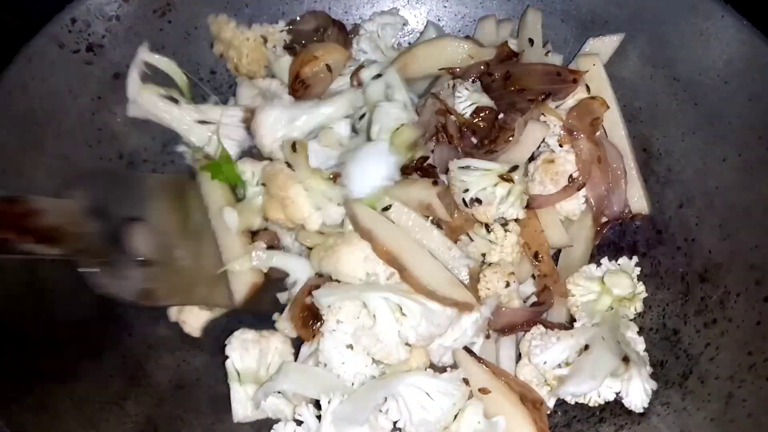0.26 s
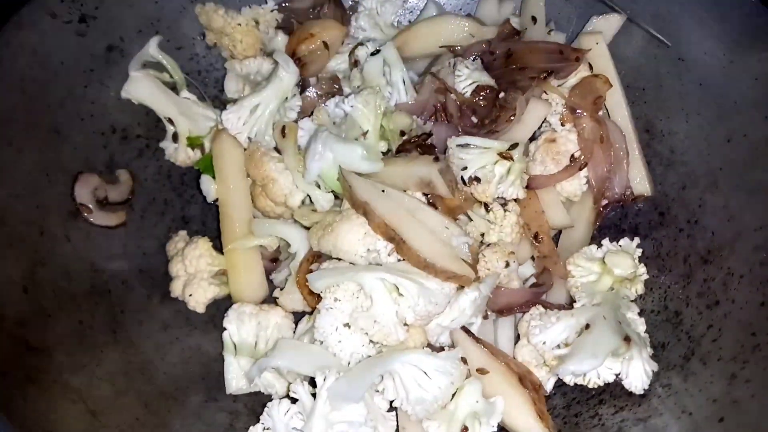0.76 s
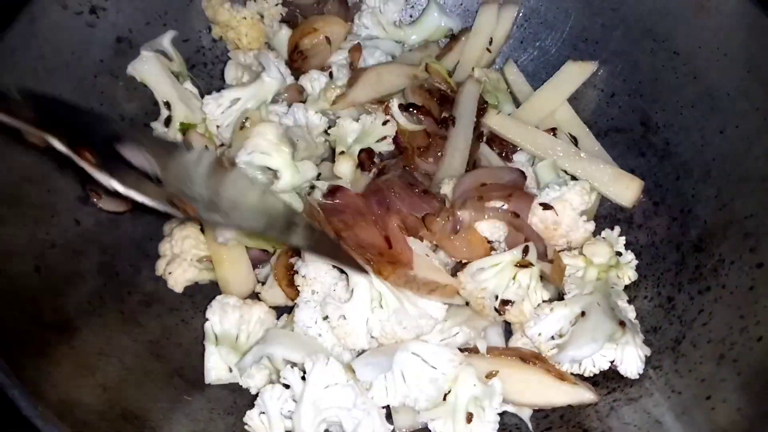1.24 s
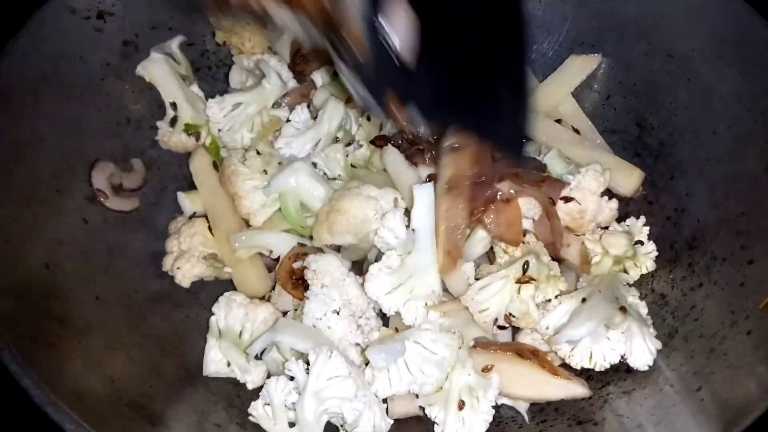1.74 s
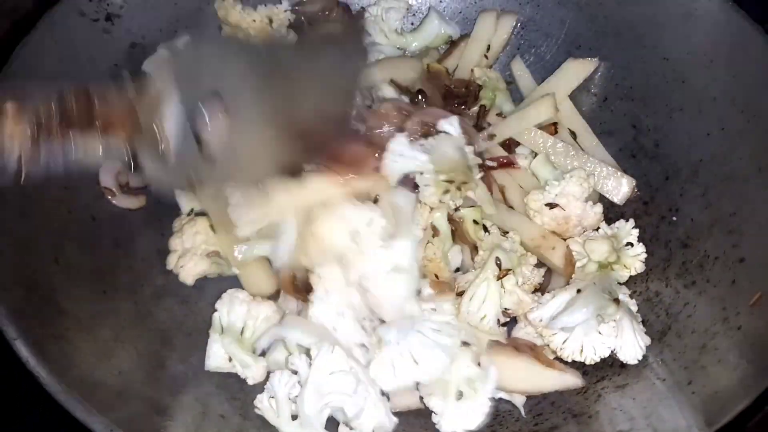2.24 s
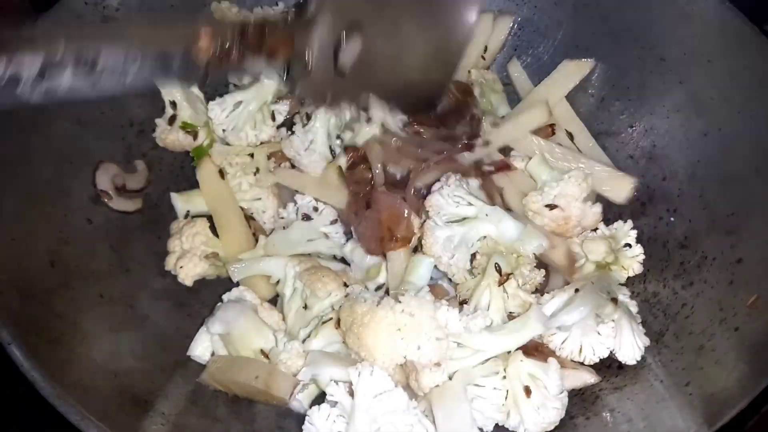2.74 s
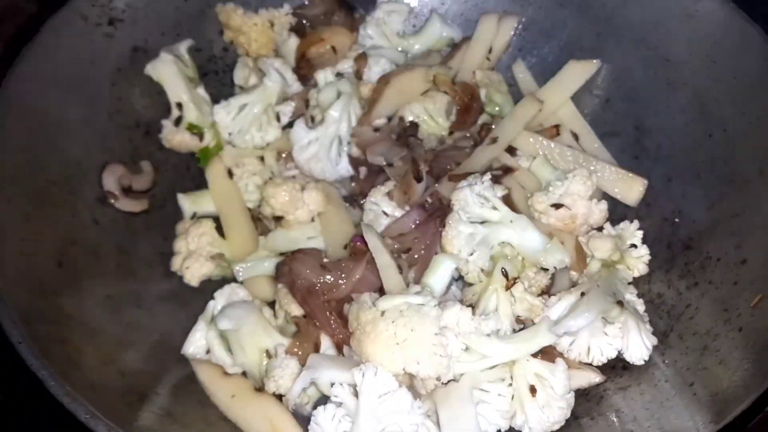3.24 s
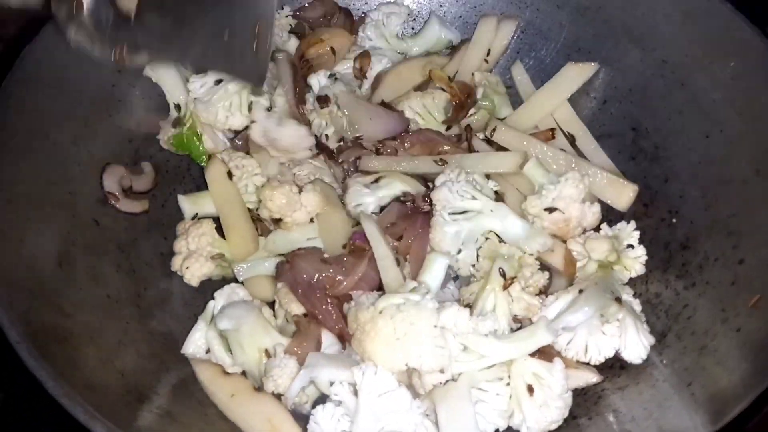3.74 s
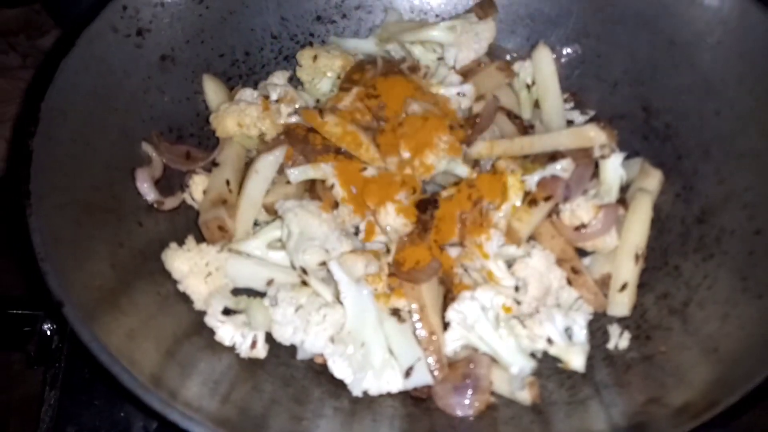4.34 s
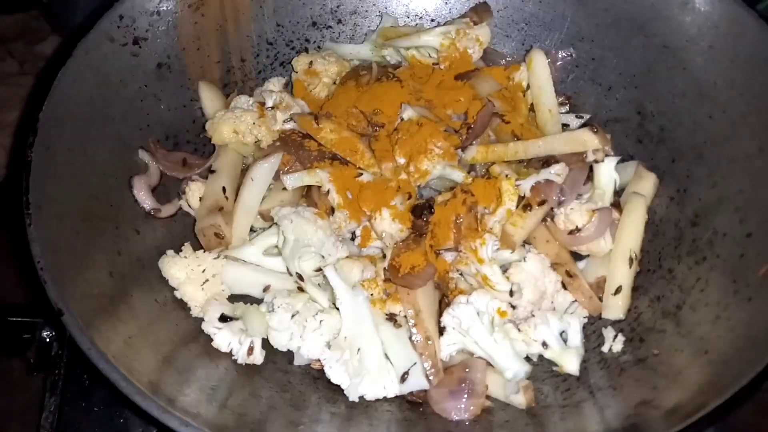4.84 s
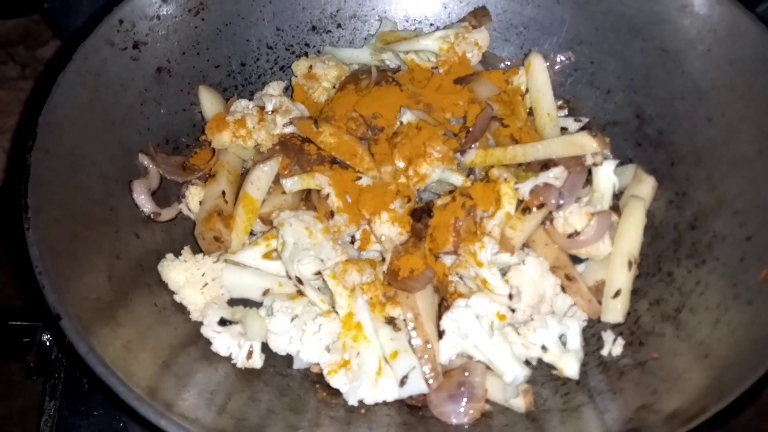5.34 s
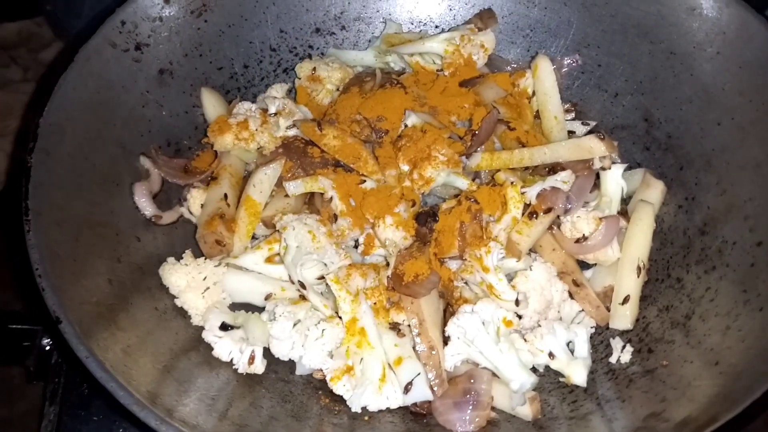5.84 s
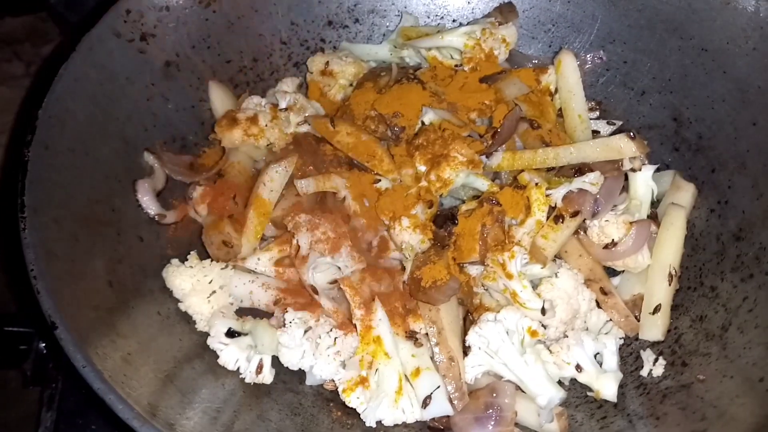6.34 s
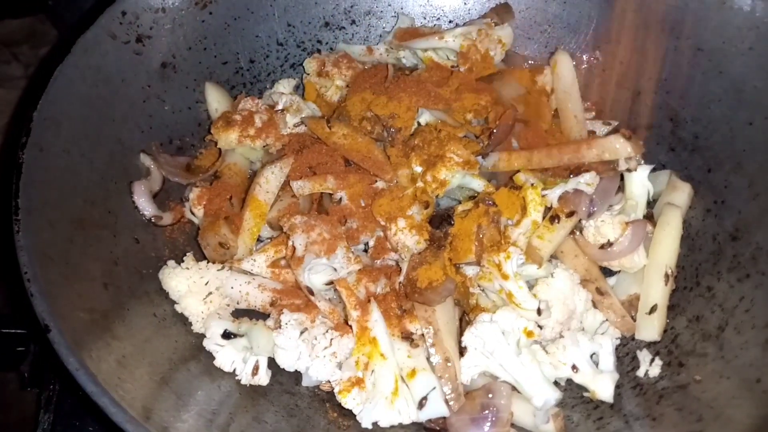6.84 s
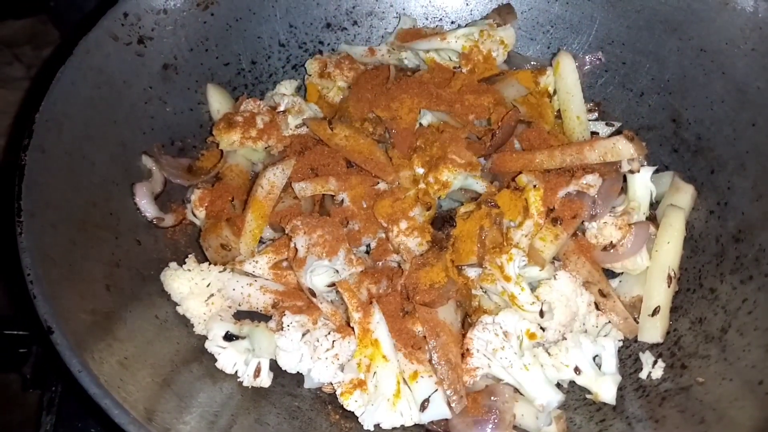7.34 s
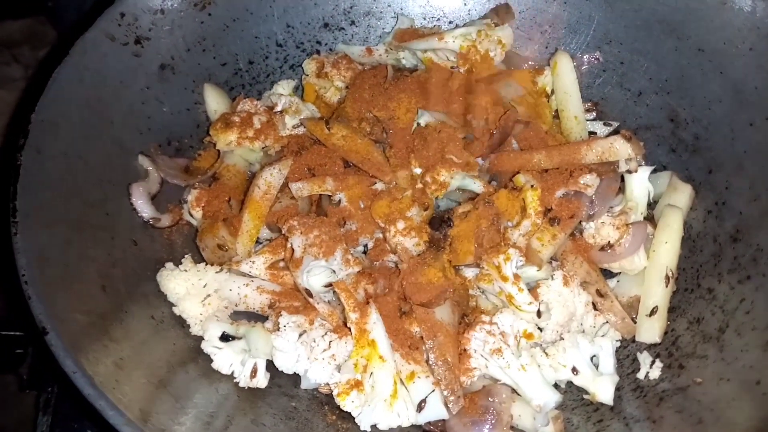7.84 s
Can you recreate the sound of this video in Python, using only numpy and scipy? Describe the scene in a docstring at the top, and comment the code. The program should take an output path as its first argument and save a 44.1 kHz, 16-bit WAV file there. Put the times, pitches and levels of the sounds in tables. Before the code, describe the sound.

A close, bright hiss of vegetables frying in a wok, dotted with crackles and pops of spitting oil.

```python
"""Vegetables fry in hot oil in a wok, close to a mono microphone. From the start, countless tiny steam
bubbles burst as a sizzle, in spurts, over the faint rush of the stove. Larger drops spit, and a limiter
ducks the sizzle around the loudest. At first the food is stirred, rubbing on the steel and knocking dully.
Near 3.8 s comes a short silent break. Then the food lies still: the sizzle is finer and a little weaker,
and for two seconds the oil spits more freely. Towards the end the sizzle thickens again."""
import sys
import numpy as np
from scipy import signal
from scipy.fft import rfft, irfft, next_fast_len
from scipy.io import wavfile
from scipy.ndimage import uniform_filter1d, minimum_filter1d, map_coordinates

SR = 44100
rng = np.random.default_rng(int(sys.argv[2]) if len(sys.argv) > 2 else 0)


def inscribe(sig):
    """Save sig as 16-bit PCM at rate SR to the path in sys.argv[1].

    A 1-D sig is mono; a 2-D sig holds one channel per row.
    Samples are clipped to [-1, 1] before scaling.
    """
    pcm = np.round(np.clip(np.atleast_2d(sig).T, -1, 1) * 32767)
    wavfile.write(sys.argv[1], SR, pcm.astype(np.int16))


N = 356769

# Reverberation time of the kitchen: frequency_hz, t60_s
ROOM_DECAY = [(200, 0.3), (2000, 0.1), (12000, 0.2)]
# Spectrum of the stove's rush: frequency_hz, relative_density_db
STOVE_SPECTRUM = [(20, -13), (60, -14), (95, 14), (140, 5), (250, -5), (600, -41), (2000, -86)]
# Response of the wok to rubbing: frequency_hz, relative_density_db
RUB_SPECTRUM = [(30, -31), (130, -16), (172, 1), (205, -10.5), (248, 6), (285, -8), (700, -0.5),
                (2000, -28), (6000, -70)]
# Shoves of the spatula: start_s, level_db
SPATULA_STROKES = [(.1, -71), (.95, -60), (1.85, -66), (2.42, -66), (3.15, -66)]
# Dull contacts of food and wok: start_s, level_db, pitch_hz
FOOD_KNOCKS = [(1.385, -57, 110), (1.948, -48, 170), (2.351, -41, 100), (2.765, -54, 190),
               (3.982, -44, 115), (5.02, -53, 220), (5.342, -46, 150)]
# The biggest slow bubbles bursting under the food: start_s, level_db
BIG_PLOPS = [(3.215, -20), (4.031, -23), (4.291, -23), (4.804, -24), (5.69, -22), (7.077, -24),
             (7.754, -23)]
# Resonances of the wok's bowl: frequency_hz, width_hz, boost_db
BOWL_MODES = [(242, 14, 13), (355, 42, 3.5), (540, 47, 4), (661, 40, 5), (726, 11, 6), (894, 31, 4.5),
              (1030, 170, 3), (1288, 62, 4), (1767, 270, 5), (2120, 230, 1), (2406, 250, 4.5),
              (3000, 84, 4), (4510, 450, 1.5), (6560, 230, 2)]
# Spectrum of one bursting bubble: frequency_hz, relative_density_db
BURST_SPECTRUM = [(100, -45), (220, -45.5), (340, -24.5), (850, -21), (1300, -15), (2150, -20.5),
                  (3100, -11.0), (4400, -5), (5300, -3.5), (6550, -1), (9200, -8.0), (12000, -18.5),
                  (13900, -23), (14650, -11)]
# How freely the oil spits: time_s, drops_per_s, typical_peak_db
SPIT_ACTIVITY = [(0, 35, -20.5), (3.8, 35, -20), (4.1, 65, -17.5), (5.8, 100, -16.5), (6.15, 35, -20),
                 (8.09, 30, -20.5)]
# The loudest spits, ahead of the limiter: start_s, peak_db
LOUD_SPITS = [(.5168, -4.5), (1.1463, -5.5), (1.2309, -6), (1.5971, -4.5), (2.2445, -2.5), (2.4746, -6.5),
              (2.7646, -4), (3.0482, -6.5), (3.8887, -6.5), (3.9248, -11), (3.9564, 2), (4.3029, -3),
              (4.4168, -1.5), (4.6229, -3.5), (4.6569, -6.5), (4.857, -3), (4.9612, -3), (5.2305, -5),
              (5.3416, -2), (5.4498, -2.5), (5.5462, -5.5), (5.6513, -1.5), (5.9207, -7), (5.958, -9),
              (7.5569, -4.5)]
# How hard the oil boils: time_s, relative_level_db
BOIL_LEVEL = [(0, -26.5), (1.0, -25), (1.8, -25.5), (2.1, -25), (3.0, -26), (3.8, -26), (4.0, -27.5),
              (4.3, -26.5), (5.0, -27.5), (5.7, -28), (6.2, -26.5), (7.0, -26), (8.09, -27)]
# Brief dips in the level of the sizzle: time_s, depth_db
SIZZLE_DIPS = [(.925, 3), (1.11, 3), (1.53, 6), (1.785, 5), (1.96, 2), (2.19, 4), (2.357, 7), (2.49, 3),
               (2.755, 2.5), (7.175, 3.5)]

BREAK_START_S, BREAK_END_S = 3.8095, 3.8858
TOP_HZ = 15750  # band limit
TIME_S = np.arange(N) / SR


def amp(db):
    """Amplitude ratio of a level in decibels."""
    return 10 ** (np.asarray(db) / 20)


def unit(x):
    """Normalisation to an rms of 1."""
    return x / np.sqrt(np.mean(x ** 2) + 1e-20)


def along(points, hz):
    """Interpolation of (frequency_hz, value) points on a logarithmic frequency axis."""
    knots_hz, values = np.transpose(points)
    return np.interp(np.log(hz + 1), np.log(knots_hz + 1), values)


def curves(rows):
    """Linear interpolation, at every sample, of each column after the time."""
    knots_s, *columns = np.transpose(rows)
    return [np.interp(TIME_S, knots_s, column) for column in columns]


def wobble(per_s):
    """Slow random modulation: a spline through Gaussian knots."""
    return map_coordinates(rng.standard_normal(int(N * per_s / SR) + 4), [TIME_S * per_s])


def filtered(x, response):
    """Linear filtering: the spectrum of x times a frequency response."""
    size = next_fast_len(N + SR // 2)
    return irfft(rfft(x, size) * response(np.fft.rfftfreq(size, 1 / SR)), size)[:N]


def shaped_noise(spectrum):
    """Spectral shaping of white noise, at an rms of 1."""
    return unit(filtered(rng.standard_normal(N), lambda hz: amp(along(spectrum, hz))))


def poisson(per_s):
    """A Poisson process: unit impulses at independent random moments."""
    return 1. * (rng.random(N) < per_s / SR)


def add(track, start_s, x):
    """Superposition of x on the track from start_s."""
    part = track[max(round(start_s * SR), 0):][:len(x)]
    part += x[:len(part)]


def kitchen(x, block=8192, delay_s=.005):
    """Short, smooth reverberation of a small hard kitchen, with a fresh random tail for each block."""
    track = np.zeros(N)
    for start in range(0, N, block):
        hz, t, noise = signal.stft(rng.standard_normal(SR // 3), SR, nperseg=256)
        decay = amp(-60 * t / along(ROOM_DECAY, hz)[:, None])
        tail = signal.istft(noise * decay, SR, nperseg=256)[1]
        echoes = signal.fftconvolve(x[start:start + block], tail / np.linalg.norm(tail))
        add(track, start / SR + delay_s, echoes)
    return track


def stove(level_db=-90, flutter_db=2.5):
    """Amplitude-modulated noise: a faint, restless low rush under the wok."""
    return amp(level_db + flutter_db * wobble(per_s=14)) * shaped_noise(STOVE_SPECTRUM)


def stirring(rise_s=0.066, fade_db_per_s=14):
    """Sliding friction of vegetables on steel: each shove builds quickly and fades as the food settles."""
    shoves = np.zeros(N)
    for start_s, level_db in SPATULA_STROKES:
        age_s = TIME_S - start_s
        fade_db = fade_db_per_s * np.maximum(age_s - rise_s, 0)
        shoves += np.clip(age_s / rise_s, 0, 1) * amp(level_db - fade_db)
    rub = shaped_noise(RUB_SPECTRUM)
    unevenness = amp(1.5 * wobble(per_s=11))
    return shoves * (TIME_S < BREAK_START_S) * unevenness * rub


def knocks(attack_s=0.00097, thud_t60_s=0.028, bowl_t60_s=0.037):
    """Impact excitation: a soft heavy contact gives a low thud and rings the bowl's two lowest modes."""
    track, t = np.zeros(N), np.arange(SR // 5) / SR
    modes = sum(np.sin(2 * np.pi * hz * t) for hz, _, _ in BOWL_MODES[:2])
    bowl = amp(-2 - 60 * t / bowl_t60_s) * modes
    thud_envelope = amp(-60 * t / thud_t60_s) * (1 - np.exp(-t / attack_s))
    for start_s, level_db, pitch_hz in FOOD_KNOCKS:
        thud = thud_envelope * np.sin(2 * np.pi * pitch_hz * t)
        add(track, start_s, amp(level_db) * (thud + bowl))
    return track


def plops(typical_hz=1320, t60_s=0.0051, small_db=-27):
    """Cavity resonance: an opening bubble gives a short rising note, with no bass below it."""
    track, t = np.zeros(N), np.arange(SR // 50) / SR
    small = [(at / SR, small_db) for at in np.flatnonzero(poisson(per_s=2))]
    for start_s, level_db in list(BIG_PLOPS) + small:
        pitch_hz = typical_hz * np.exp(.1 * rng.standard_normal())
        note = np.sin(2 * np.pi * pitch_hz * t * (1 + 25 * t))
        add(track, start_s, amp(level_db - 60 * t / t60_s) * note)
    return signal.sosfilt(signal.butter(N=2, Wn=650, btype="high", fs=SR, output="sos"), track)


def bubble_click(size=4096):
    """Minimum-phase impulse response of one burst with the bowl ringing after it, peak 1."""
    hz = np.fft.rfftfreq(size, 1 / SR)
    bowl_db = sum(boost_db / (1 + (2 * (hz - mode_hz) / width_hz) ** 2)
                  for mode_hz, width_hz, boost_db in BOWL_MODES)
    cepstrum = irfft(np.log(amp(along(BURST_SPECTRUM, hz) + bowl_db)))
    cepstrum[1:size // 2] *= 2  # folding the cepstrum makes the click causal
    cepstrum[size // 2 + 1:] = 0
    click = irfft(np.exp(rfft(cepstrum)))
    return click / np.abs(click).max()


def spit(pitch_hz, ring_cycles=3.5, spray_decay_s=.0006):
    """Damped oscillation: a drop's skin snaps, its cavity rings and a puff of spray follows."""
    t = np.arange(SR // 200) / SR
    snap = t == 0
    ring = .2 * np.cos(2 * np.pi * pitch_hz * t) * np.exp(-t * pitch_hz / ring_cycles)
    spray = .15 * rng.standard_normal(len(t)) * np.exp(-t / spray_decay_s)
    return snap + ring + spray


def spits(small_hz=8300, loud_hz=7000):
    """Impulsive sources: drops explode in the oil, a few loud ones among many of random size and pitch."""
    drops_per_s, typical_db = curves(SPIT_ACTIVITY)
    onsets = np.flatnonzero(poisson(drops_per_s))
    size_scatter, pitch_scatter = np.clip(rng.standard_normal((len(onsets), 2)), -2, 2).T
    small_db = typical_db[onsets] + 4.8 * size_scatter
    small = np.column_stack([onsets / SR, small_db, small_hz * np.exp(0.23 * pitch_scatter)])
    loud = np.column_stack([LOUD_SPITS, loud_hz * np.exp(0.16 * rng.standard_normal(len(LOUD_SPITS)))])
    track, click = np.zeros(N), bubble_click()
    for start_s, peak_db, pitch_hz in np.vstack([loud, small]):
        pop = np.convolve(spit(pitch_hz), click)
        add(track, start_s, amp(peak_db) * pop / np.abs(pop).max())
    return track


def in_wok(pulses):
    """Convolution turns every pulse into a bubble's click."""
    return signal.fftconvolve(pulses, bubble_click())[:N]


def bubbles(per_s, spread_db):
    """Shot noise: tiny bursts of scattered size and random sign."""
    return poisson(per_s) * amp(spread_db * np.clip(rng.standard_normal(N), -2, 2)) * rng.choice([-1, 1], N)


def pings(per_s, decay_s, spread_db, size=128):
    """Free vibration: bubbles ring briefly, each at its own natural frequency."""
    onsets = np.flatnonzero(poisson(per_s))
    draws = rng.random((len(onsets), 2))
    level_db, pitch_hz = spread_db * draws[:, :1], TOP_HZ * draws[:, 1:]
    t = np.arange(size) / SR
    rings = amp(level_db) * np.sin(2 * np.pi * pitch_hz * t) * np.exp(-t / decay_s)
    samples = onsets[:, None] + np.arange(size)
    return np.bincount(samples.ravel(), rings.ravel(), N)[:N]


def spurts(per_s, decay_s, depth):
    """Flash boiling: water meets hot metal, and the bubbling jumps up at once and dies away."""
    t = np.arange(SR // 4) / SR
    jets = signal.fftconvolve(poisson(per_s), np.exp(-t / decay_s))[:N]
    return unit(1 + depth * np.tanh(jets))  # the heat at hand bounds overlapping spurts


def dips(fall_s=0.014, recover_s=0.031):
    """Attenuation in decibels: the level falls quickly and recovers more slowly."""
    loss_db = np.zeros(N)
    for time_s, depth_db in SIZZLE_DIPS:
        width_s = np.where(TIME_S < time_s, fall_s, recover_s)
        loss_db += depth_db * np.exp(-((TIME_S - time_s) / width_s) ** 2)
    return loss_db


def sizzle(split_hz=2200, coarse_hz=3900, coarse_width_hz=1300):
    """Incoherent sum of bursts: bright fizz on the open oil and dark sputter under the food share one boil."""
    def lowpass(hz):
        return 1 / (1 + 1j * np.sqrt(2) * hz / split_hz - (hz / split_hz) ** 2)

    boil_db = curves(BOIL_LEVEL)[0] + 0.82 * wobble(per_s=14) - dips()
    steam = spurts(per_s=150, decay_s=0.0059, depth=0.38)
    # Stirring turns up wet faces that bubble coarsely; still food fizzes finer.
    stirred = TIME_S < BREAK_END_S
    sputter_db = np.where(stirred, -12, -14)
    coarse_db = np.where(stirred, 0.63, -0.33)
    fine = unit(bubbles(per_s=14000, spread_db=3))
    fine += amp(-7.5) * unit(pings(per_s=2200, decay_s=0.00059, spread_db=18))
    fizz = unit(filtered(in_wok(fine), lambda hz: (hz / split_hz) ** 2 * lowpass(hz)))  # high-pass
    # Larger bubbles sound at the lower edge of the hiss.
    coarse = filtered(fizz, lambda hz: np.exp(-((hz - coarse_hz) / coarse_width_hz) ** 2))
    fizz += (amp(coarse_db) - 1) * coarse
    sputter = unit(filtered(in_wok(bubbles(per_s=4500, spread_db=4.5)), lowpass))
    return steam * amp(boil_db) * (amp(3.5) * fizz + amp(sputter_db) * sputter)


def scene():
    """Superposition of the wok's direct sound, a weak reverberant field and the stove."""
    wok = sizzle() + spits() + plops() + knocks() + stirring()
    return np.tile(wok + amp(-13) * kitchen(wok) + stove(), (2, 1))


def limiter(x, ceiling_db, hold_s):
    """Look-ahead limiting: the gain sinks just ahead of each high peak and comes back after it."""
    needed_gain = np.minimum(1, amp(ceiling_db) / (np.abs(x) + 1e-9))
    span = int(hold_s * SR)
    held_gain = minimum_filter1d(needed_gain, span, origin=span // 4)
    return x * uniform_filter1d(held_gain, span // 2)


def record(dry):
    """Limiting, gating at the break and band limiting of one channel, heard on both sides."""
    sounding = (TIME_S < BREAK_START_S) | (TIME_S > BREAK_END_S)
    gate = uniform_filter1d(1. * sounding, size=SR // 400)
    limited = limiter(dry[0], ceiling_db=-6.5, hold_s=.038)
    mono = filtered(limited * gate, lambda hz: np.clip((TOP_HZ - hz) / 100 + .5, 0, 1))
    return np.tile(mono, (2, 1))


dry = scene()
out = record(dry)
inscribe(out)
```